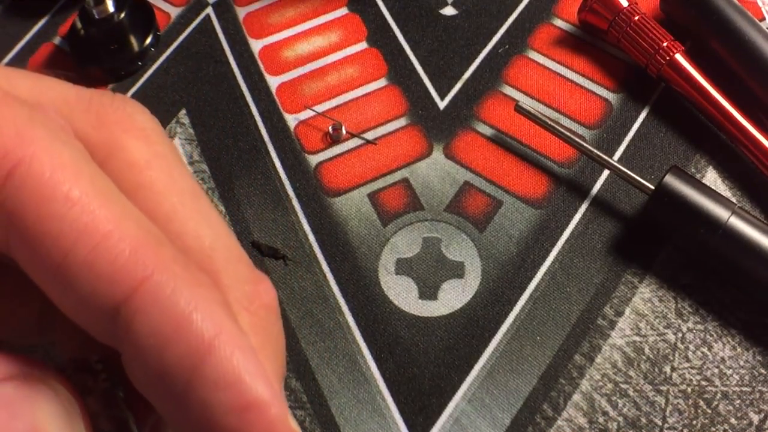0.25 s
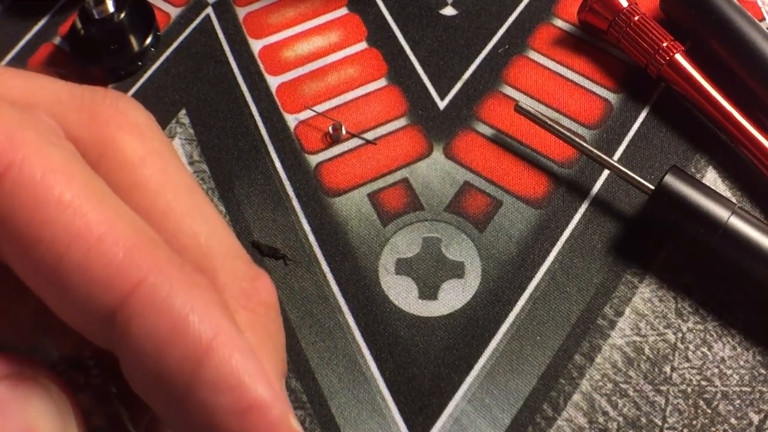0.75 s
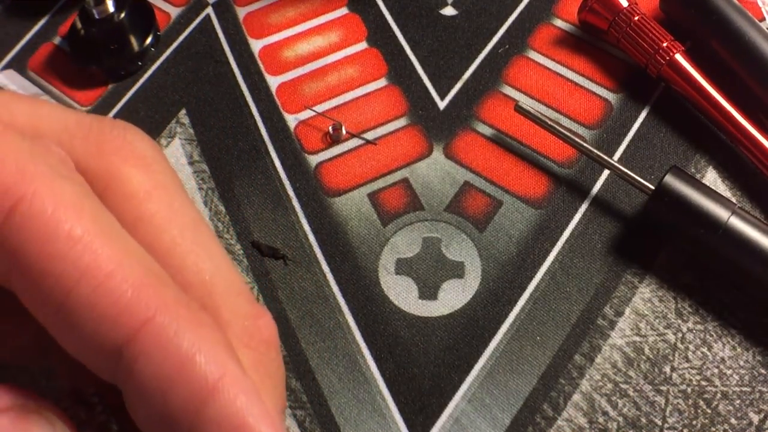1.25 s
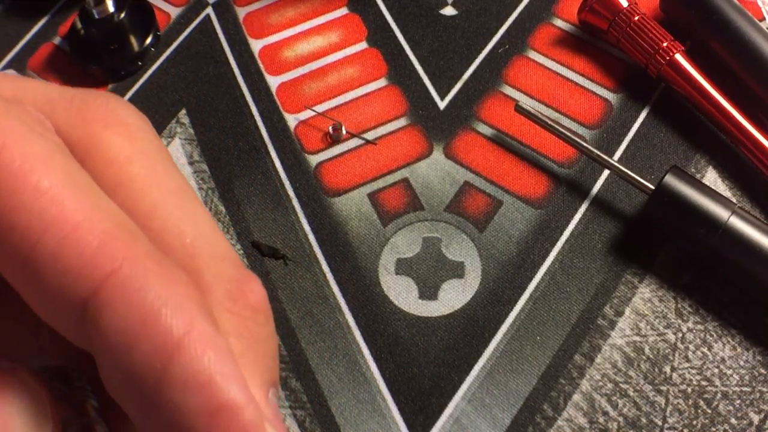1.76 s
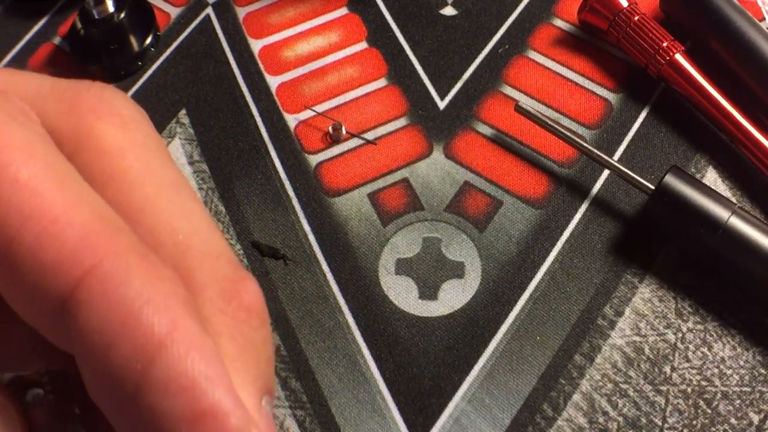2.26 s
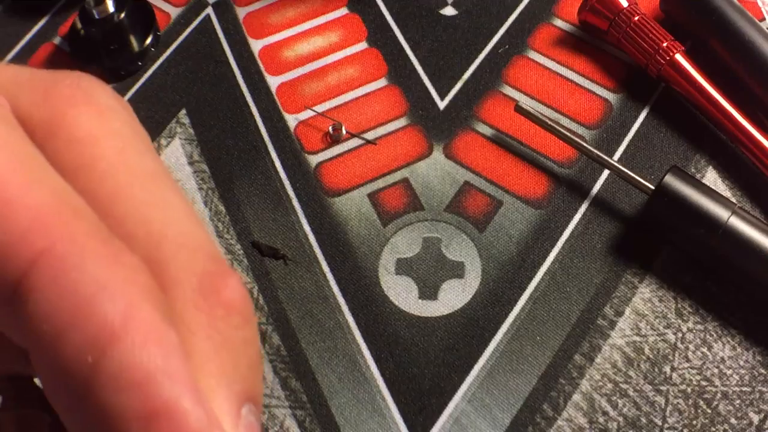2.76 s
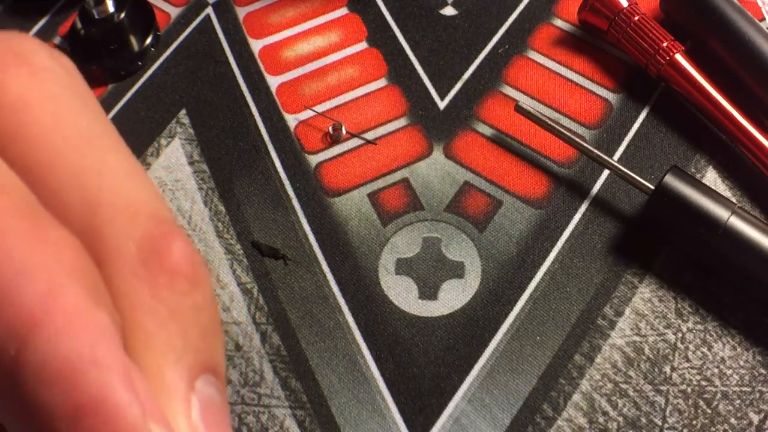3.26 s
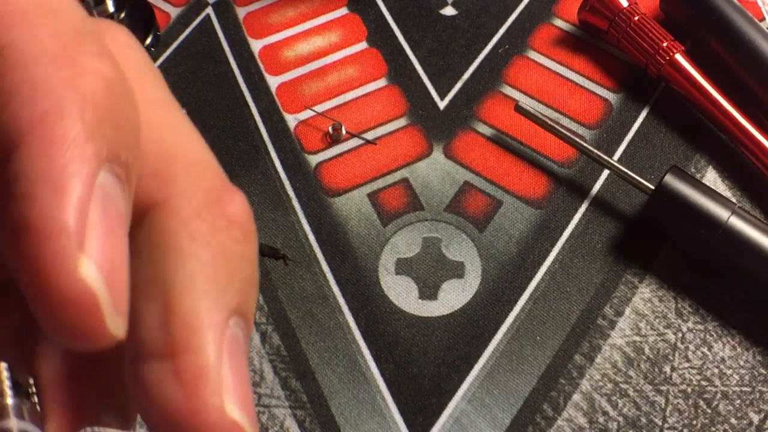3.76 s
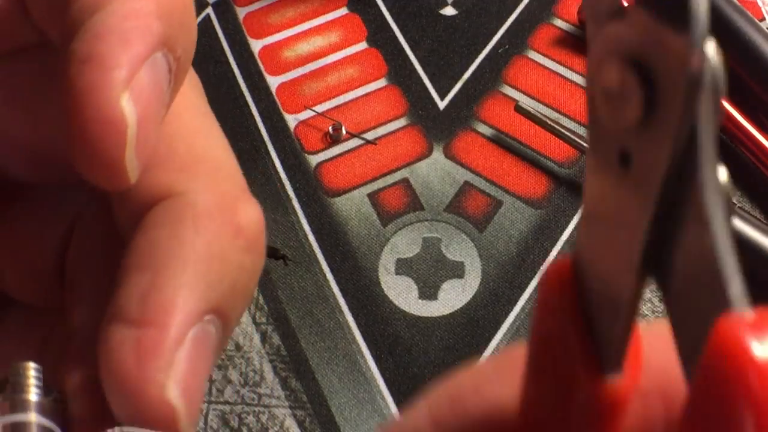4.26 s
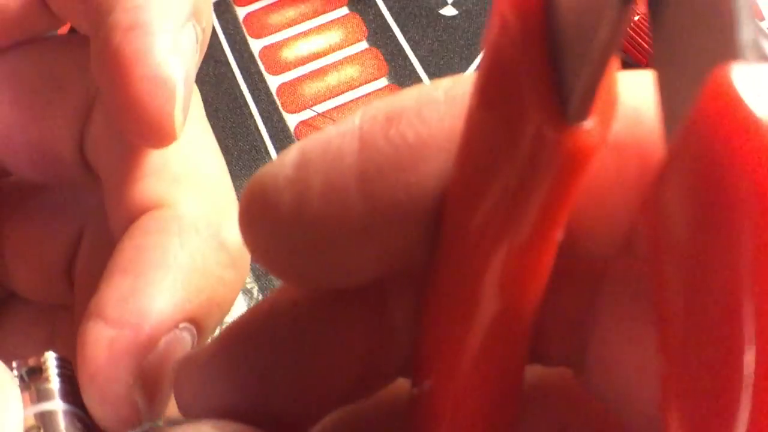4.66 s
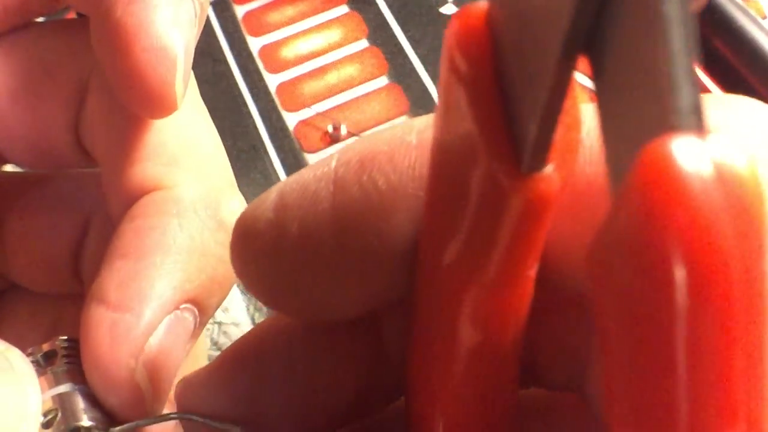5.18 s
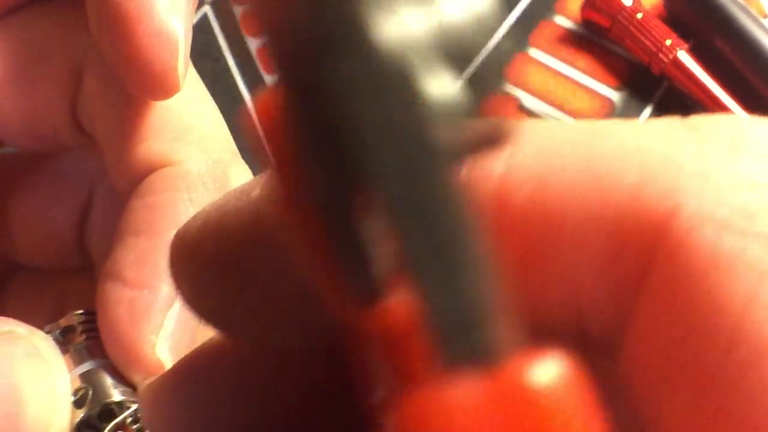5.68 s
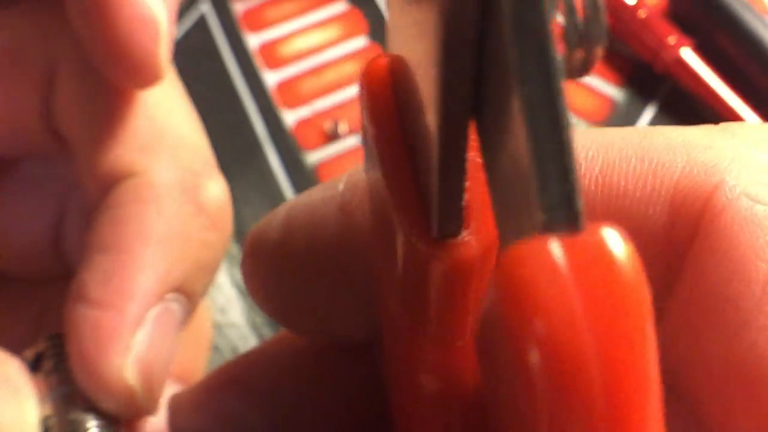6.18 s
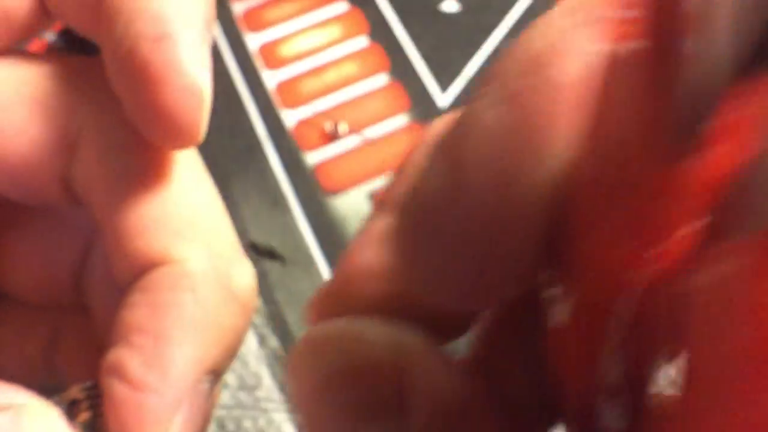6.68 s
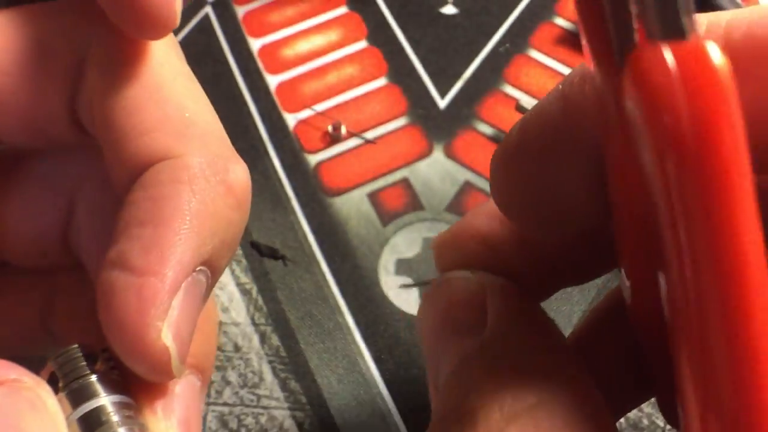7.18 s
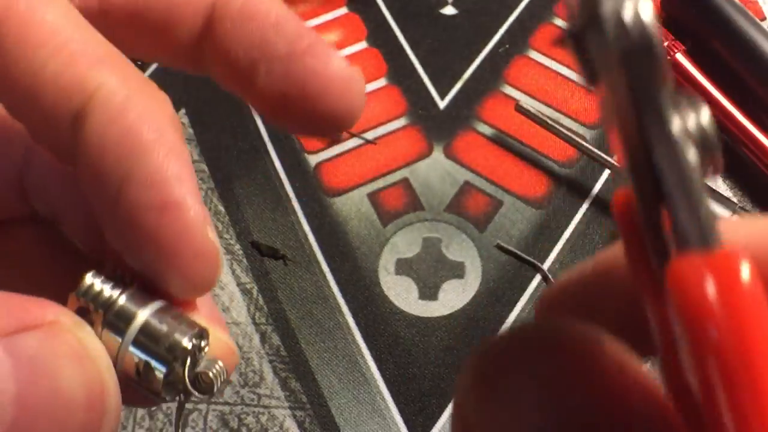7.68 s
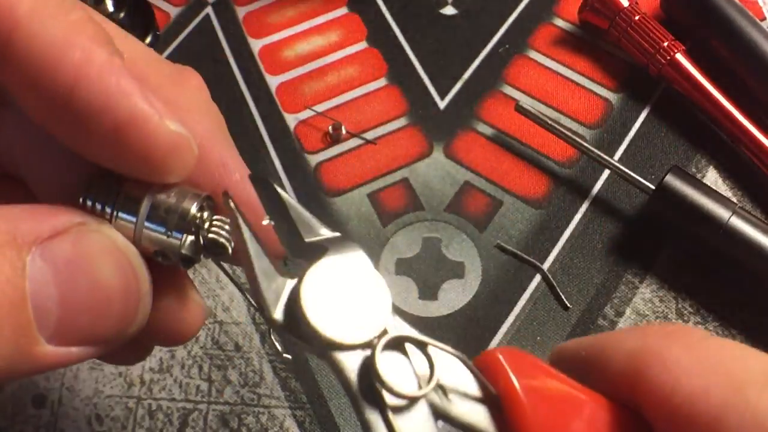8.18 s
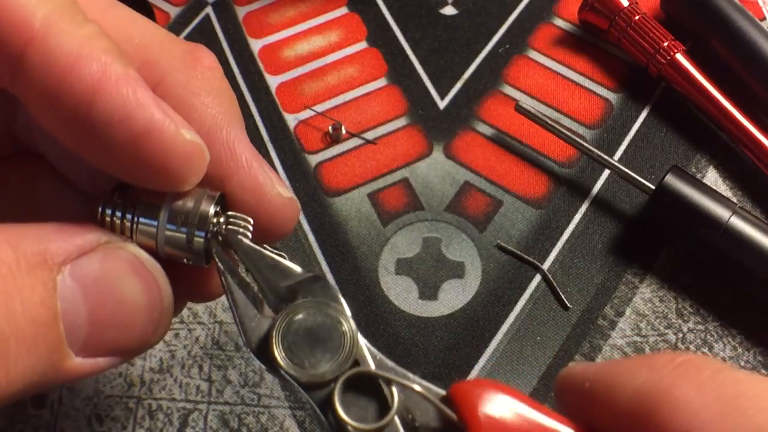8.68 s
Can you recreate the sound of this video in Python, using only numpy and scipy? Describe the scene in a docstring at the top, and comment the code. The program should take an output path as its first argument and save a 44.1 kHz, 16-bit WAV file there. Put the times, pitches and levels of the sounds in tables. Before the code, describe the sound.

Close microphone at a covered table indoors, almost dry. Low handling rumble and skin rustle accompany sparse tiny metallic clicks, one clearer than the rest. Midway steel slides briefly and a tool knocks the table hard with a loose metallic rattle. A weaker double bump comes later, then a sudden sharp wire snap, by far the loudest event. Soft dull taps and quiet rubbing end it, with faint mains hum beneath.

```python
"""At a mat-covered table in a quiet room, fingers handle a small metal coil holder that ticks and bumps.
Flush cutters are picked up with a scrape, knock twice on the table, then snap through a coil wire.
Metal parts sound as struck resonators, the table as decaying modes, and rubbing as filtered noise.
Beneath lie a low handling rumble, a faint mains hum and hiss; a very faint high whine comes and goes."""
import sys
import numpy as np
from scipy import signal
from scipy.fft import rfft, irfft
from scipy.io import wavfile
from scipy.ndimage import uniform_filter1d

SR = 44100
rng = np.random.default_rng(int(sys.argv[2]) if len(sys.argv) > 2 else 0)


def unload_wav(signal):
    """Save mono or channel-first audio to the path in sys.argv[1] as 16-bit WAV at rate SR, clipped to [-1, 1]."""
    wavfile.write(
        sys.argv[1],
        SR,
        np.round(np.clip(np.atleast_2d(signal).T, -1, 1) * 32767).astype(np.int16),
    )


N = 394254
TIME = np.arange(N) / SR

# Mains hum, steady tones: pitch_hz [Hz], level_db [dB]
HUM_TONES = [(60, -72.5), (108, -81.5), (241, -88)]
# Spectrum of the background hiss: frequency_hz [Hz], level_db [dB]
HISS_SPECTRUM = [(100, 1), (240, 2), (330, -4.5), (600, -10.5), (1500, -12.5), (3000, -9), (3700, -11.5),
                 (4200, -14.5), (5500, -9.5), (9200, -10), (10500, -15.5), (11600, -13), (16000, -21)]
# Times when the faint whine sounds: start_s [s], end_s [s]
WHINE_TIMES = [(3.43, 3.68), (8.56, 8.8)]
# Spectrum of the table's deep sway: frequency_hz [Hz], level_db [dB]
RUMBLE_SPECTRUM = [(20, -31), (32, -13.5), (48, 7), (60, 0.5), (80, -17), (170, -33), (600, -61)]
# Rumble of the resting hands, before UNREST_GAIN_DB: time_s [s], level_db [dB]
UNREST_LEVELS = [(0.0, -59.5), (0.9, -61), (1.77, -54), (2.09, -65.5), (3.09, -71.5), (3.5, -64),
                 (7.45, -63), (8.05, -58), (8.94, -74.5)]
# Hands lean on the table without a knock: middle_s [s], length_s [s], level_db [dB]
LEANS_ON_TABLE = [(0.192, 0.2, -40.5), (0.432, 0.12, -45), (0.627, 0.11, -46.5), (1.295, .07, -44.5),
                  (2.175, 0.085, -50), (3.292, 0.26, -50), (3.651, 0.1, -41.5), (4.149, .09, -40.5),
                  (4.248, 0.1, -49.5), (6.464, 0.25, -51.5), (6.755, 0.22, -42.5), (7.452, 0.087, -48.5),
                  (7.606, 0.12, -50), (8.539, 0.098, -51)]
# Fingers rub over tool and mat: middle_s [s], length_s [s], rustle_db [dB], hiss_db [dB]
FINGER_RUBS = [(0.17, 0.14, -63.5, -77), (0.476, 0.34, -74, -80.5), (0.99, .25, -74, -92),
               (1.623, 0.079, -64.5, -73), (1.76, 0.11, -63.5, -71), (1.883, 0.13, -71, -78),
               (4.142, 0.098, -62.5, -62), (4.371, 0.063, -61.5, -65.5), (6.439, 0.053, -63, -82),
               (6.53, 0.11, -66, -79), (6.772, 0.31, -67, -69.5), (7.576, 0.16, -64.5, -69.5),
               (7.694, 0.13, -68.5, -75.5), (7.91, 0.091, -69, -82), (7.96, 0.36, -72, -77),
               (8.18, 0.12, -87, -75.5)]
# Spectrum of the low rustle: frequency_hz [Hz], level_db [dB]
RUSTLE_SPECTRUM = [(90, -12), (205, 5), (285, -3.5), (375, 2.5), (520, -19.5), (680, -7.5), (1100, -33.5),
                   (3000, -26)]
# Spectrum of the fine hiss of skin: frequency_hz [Hz], level_db [dB]
SKIN_SPECTRUM = [(1000, -8.5), (2600, -5), (4000, -13.5), (6300, 1), (8500, -2.5), (11000, -11),
                 (16000, -21.5)]
# Dry scuffs of handles, jaws and holder: middle_s [s], length_s [s], level_db [dB], centre_hz [Hz]
DRY_SCUFFS = [(0.175, 0.04, -74, 5400), (1.207, 0.031, -71, 1420), (1.454, 0.016, -58, 580),
              (1.597, .018, -72, 2700), (4.363, 0.056, -65, 2390), (4.3955, 0.006, -38.5, 1200),
              (5.628, 0.047, -67.5, 780), (6.303, 0.048, -59, 694), (6.679, .014, -64, 6500),
              (7.443, .037, -65.5, 330), (7.59, 0.12, -72, 6800), (8.146, .018, -65.5, 5700)]
# Skin or steel sticks and squeaks softly: middle_s [s], length_s [s], level_db [dB], pitch_hz [Hz]
SOFT_SQUEAKS = [(0.097, 0.058, -75, 650), (0.357, 0.025, -66, 690), (1.165, .04, -74.5, 690),
                (4.144, .009, -56, 10050), (5.75, 0.038, -75.5, 525), (5.86, .1, -79.5, 525),
                (5.961, 0.047, -73.5, 530), (7.575, 0.08, -68, 400)]
# Steel slides as the cutters are lifted and turned: start_s [s], level_db [dB], t60_s [s]
STEEL_SCRAPES = [(4.082, -51.5, 0.089), (4.087, -58.5, .12), (4.118, -65.5, 0.2), (7.384, -65.5, .03)]
# Resonances of the sliding steel: pitch_hz [Hz], width_hz [Hz], level_db [dB]
STEEL_MODES = [(5380, 160, 3.5), (5820, 270, -1), (7260, 200, -3), (8190, 430, -6.5), (9650, 200, -2),
               (9900, 220, 0), (11050, 290, -4), (15400, 530, -12)]
# Loose parts buzz around the hard knocks: start_s [s], level_db [dB], t60_s [s]
LOOSE_BUZZES = [(4.3885, -42.5, 0.046), (4.401, -59, 0.045), (6.2785, -50.5, 0.033), (6.285, -52, 0.16)]
# Spectrum of the buzz: frequency_hz [Hz], level_db [dB]
BUZZ_SPECTRUM = [(500, 2), (1000, -0.5), (1400, -9), (2100, -3.5), (2500, 0.5), (3200, -8), (4300, -8.5),
                 (5400, -7), (6000, -21), (8000, -23.5), (15000, -42.5)]
# One loose metal part bounces: start_s [s], level_db [dB]
BOUNCES = [(4.4015, -25), (4.408, -22), (6.279, -24)]
# Resonances of that loose part: pitch_hz [Hz], width_hz [Hz], level_db [dB]
LOOSE_PART_MODES = [(2500, 110, 1), (5300, 450, -0.5)]
# The holder shifts in the fingers with a dull double click: start_s [s], level_db [dB]
HOLDER_NUDGES = [(1.211, -23), (1.214, -19.5)]
# Resonances of the gripped holder: pitch_hz [Hz], width_hz [Hz], level_db [dB]
GRIPPED_MODES = [(1070, 100, 3.5), (1420, 130, 5.5), (2690, 260, 2), (6500, 2000, -13)]
# Dull taps of the tool in the hand: start_s [s], level_db [dB]
TOOL_TAPS = [(7.4285, -16), (7.433, -23), (7.488, -19.5), (7.521, -31)]
# Resonances of the hand-held tool: pitch_hz [Hz], width_hz [Hz], level_db [dB]
TOOL_MODES = [(860, 130, 2.5), (1300, 150, 3), (1880, 130, 1.5), (2280, 180, -0.5), (2630, 130, -2),
              (3040, 110, -1), (6360, 4000, -20)]
# Small metal ticks of wire and holder: start_s [s], level_db [dB], brightness_db [dB]
METAL_TICKS = [(0.4962, -36.5, 4), (1.361, -41, -4), (1.45, -39, -3), (1.4995, -35.5, 3), (1.731, -39.5, 3),
               (2.0947, -22, -0.5), (2.503, -38, 1), (3.275, -51, 5), (3.5066, -40, 3), (3.5906, -39, -3),
               (4.51, -39, 5.5), (4.7314, -39.5, -3), (5.5135, -38.5, 2.5), (6.5165, -34, 3),
               (7.5205, -37, 4), (8.144, -43, 0), (8.4617, -37.5, 3)]
# Resonances of the free holder: pitch_hz [Hz], width_hz [Hz], level_db [dB]
HOLDER_MODES = [(1687, 50, 3.5), (2160, 280, -5), (2880, 260, 3), (4410, 550, 6), (4930, 960, 2),
                (5680, 140, 7), (6500, 490, 6), (9430, 1000, 4), (11530, 350, 5), (13400, 860, -1),
                (15400, 1100, -9)]
# Padded bumps on the table: start_s [s], level_db [dB], hand_firmness [0-1], upper_lift_db [dB]
TABLE_KNOCKS = [(0.078, -62, 0.7, -6), (0.349, -61, 1, 0), (0.723, -58, 0.7, 1), (1.232, -52, 0.96, 4.5),
                (1.452, -52, 0.5, 3), (1.597, -53, 0.76, -2.5), (1.733, -52, 0.92, 0),
                (1.895, -58.5, 0.6, 2), (2.003, -54, 0.33, 2.5), (4.3902, -22.5, 0.19, 1),
                (4.99, -65, 0.2, 7.5), (5.192, -59.5, 0.63, 3), (5.388, -54, 0.5, 6), (5.532, -57, 0.46, 3),
                (6.2793, -41, 0.8, 2.5), (6.2934, -39.5, 0.6, 0), (6.688, -53, 0.7, -3),
                (6.856, -63.5, 1, 4), (8.064, -63, 0.65, -4)]
# Modes of the table before the hand acts on them: pitch_hz [Hz], level_db [dB], t60_s [s]
TABLE_MODES = [(117, -8, 0.065), (198.2, 2.5, 0.26), (315, -6.5, 0.034), (342, -35, 0.5),
               (380, -3.5, 0.058), (534, -32, 0.12), (665, -18.5, 0.085), (738, -25.5, 0.18)]
# Resonances of the breaking wire: pitch_hz [Hz], width_hz [Hz], level_db [dB]
CRACK_MODES = [(7760, 960, 4), (8800, 1400, 1), (10000, 900, -3), (1760, 1500, -16)]
# The jaws slam shut and chatter: start_s [s], level_db [dB]
JAW_CLASHES = [(6.6856, -15), (6.6925, -19), (6.6982, -8), (6.6999, -13), (6.7016, -12), (6.7112, -3.5),
               (6.713, -6), (6.7148, -6.5)]
# Resonances of the jaws: pitch_hz [Hz], width_hz [Hz], level_db [dB]
JAW_MODES = [(1266, 150, 2.5), (2390, 250, -2.5), (2900, 92, -3), (3530, 110, -3.5), (5360, 470, -0.5),
             (5750, 240, 5), (6380, 280, 3), (6800, 120, 2.5), (7750, 680, 1), (8700, 380, -4),
             (9200, 300, -4), (12000, 410, -1.5), (13600, 1700, -9.5)]

HISS_DB = -73.5
WHINE_HZ, WHINE_DB = 8850, -85.5
UNREST_GAIN_DB, UNREST_SWING_DB, UNREST_PER_S = 3, 6.5, 13
# Sway around each bump: lag of its middle, length, level re the bump, ceiling
SWAY_LAG_S, SWAY_S, SWAY_DB, SWAY_TOP_DB = 0.05, 0.13, 7.5, -44.5
# Durations of contact noise, to -60 dB
TICK_T60_S, TAP_T60_S, JAW_T60_S = 0.006, 0.013, 0.002
TICK_PIVOT_HZ = 6500   # brightness raises modes from here up and lowers those below
CONTACT_MS = 0.44   # time at which the push on the table peaks
BUILD_S, STIFFEN, RELAX_S = 0.008, 0.073, 0.03   # the first two scale with the firmness of the hand
BUMP_S = 0.042   # a bump's level is its mean power over this time
CRACK_S, CRACK_DB = 6.6855, 3
CUTOFF_HZ = 16400


def from_db(db):
    """The decibel law: amplitude gain from level."""
    return 10 ** (np.asarray(db) / 20)


def rms_one(x):
    """Normalization: scale a signal to unit mean power."""
    return x / np.sqrt(np.mean(x ** 2) + 1e-20)


def add(track, s, sound):
    """Superposition: sum a sound into the track from a given time."""
    start = max(0, round(s * SR))
    track[start:start + len(sound)] += sound[:N - start]


def fade(t60):
    """Exponential decay: the level falls linearly, followed down to -60 dB."""
    t = np.arange(int(t60 * SR) + 2) / SR
    return np.exp(-np.log(1000) * t / t60)


def fading_noise(t60):
    """Diffuse decay: white noise under an exponential envelope."""
    envelope = fade(t60)
    return envelope * rng.standard_normal(len(envelope))


def swell(length):
    """Gradual onset and release: a half-sine envelope."""
    return np.sqrt(np.hanning(int(length * SR)))


def noise(spectrum):
    """Spectral shaping: white noise weighted over log frequency, at unit power."""
    hz, db = np.transpose(spectrum)
    f = np.maximum(np.fft.rfftfreq(N, 1 / SR), 1)
    top_rolloff = 1 + (f / (2 * hz[-1])) ** 2
    gain = from_db(np.interp(np.log(f), np.log(hz), db)) / top_rolloff
    return rms_one(irfft(rfft(rng.standard_normal(N)) * gain, N))


def body(force, resonances):
    """Modal superposition: a force drives parallel resonators of alternating sign."""
    out = np.zeros(N)
    for k, (hz, width, db) in enumerate(resonances):
        r = np.exp(-np.pi * width / SR)
        poles = [1, -2 * r * np.cos(2 * np.pi * hz / SR), r * r]
        gain = (-1) ** k * from_db(db) * (1 - r * r) / 2
        out += gain * signal.lfilter([1, 0, -1], poles, force + 1e-18)
    return out


def contacts(rows, t60, grit):
    """Impulsive excitation: one sharp push, then a brief spray of tiny slips."""
    force = np.zeros(N)
    for s, db in rows:
        push = fading_noise(t60)
        push *= grit / np.linalg.norm(push)
        push[0] = 1
        add(force, s, from_db(db) * push / np.linalg.norm(push))
    return force


def bursts(rows):
    """Transient envelopes: sudden starts that die away exponentially."""
    level = np.zeros(N)
    for s, db, t60 in rows:
        add(level, s, from_db(db) * fade(t60))
    return level


def catching(rate_hz, depth_db):
    """Irregular modulation: a gain gliding between random levels, at unit power."""
    knots = np.arange(0, TIME[-1] + 1, 1 / rate_hz)
    wander = np.interp(TIME, knots, rng.uniform(-1.1, 1, len(knots)))
    return rms_one(from_db(depth_db * wander))


def background():
    """Stationary sound: steady sinusoids of mains hum beside shaped noise."""
    hum = np.zeros(N)
    for hz, db in HUM_TONES:
        hum += np.sqrt(2) * from_db(db) * np.sin(2 * np.pi * (hz * TIME + rng.random()))
    return hum + from_db(HISS_DB) * noise(HISS_SPECTRUM)


def whine(width_hz=60):
    """Narrow-band noise: a sharp resonance gives a slightly rough tone, switched on and off."""
    on = sum((TIME > start) & (TIME < end) for start, end in WHINE_TIMES)
    tone = rms_one(body(rng.standard_normal(N), [(WHINE_HZ, width_hz, 0)]))
    return from_db(WHINE_DB) * on * tone


def rumble(low_hz=31):
    """Addition of powers: the table sways with resting hands, leaning hands and bumps."""
    s, db = np.transpose(UNREST_LEVELS)
    unrest = from_db(np.interp(TIME, s, db) + UNREST_GAIN_DB)
    power = (unrest * catching(UNREST_PER_S, UNREST_SWING_DB)) ** 2
    sways = [(s + SWAY_LAG_S, SWAY_S, min(db + SWAY_DB, SWAY_TOP_DB)) for s, db, _, _ in TABLE_KNOCKS]
    for middle, length, db in LEANS_ON_TABLE + sways:
        add(power, middle - length / 2, (from_db(db) * swell(length) ** 2) ** 2)
    sway = noise(RUMBLE_SPECTRUM)
    local_power = uniform_filter1d(sway ** 2, size=3000)
    sway *= np.sqrt(power / (local_power + 1e-9))   # holds the noise to the wanted power
    return signal.sosfilt(signal.butter(4, low_hz, "high", fs=SR, output="sos"), sway)


def rubs():
    """Sliding friction: each stroke swells and fades as a low rustle and a fine hiss of skin."""
    low, high = np.zeros(N), np.zeros(N)
    for middle, length, low_db, high_db in FINGER_RUBS:
        add(low, middle - length / 2, from_db(low_db) * swell(length))
        add(high, middle - length / 2, from_db(high_db) * swell(length))
    rustle = low * noise(RUSTLE_SPECTRUM) * catching(rate_hz=50, depth_db=6.5)
    hiss = high * noise(SKIN_SPECTRUM) * catching(rate_hz=330, depth_db=7)
    return rustle + hiss


def scuffs(span=1.55, squeak_span=1.07):
    """Friction bandwidth: broad noise for dry slides, a narrow band where surfaces stick."""
    out = np.zeros(N)
    for rows, ratio in ((DRY_SCUFFS, span), (SOFT_SQUEAKS, squeak_span)):
        for middle, length, db, hz in rows:
            band = signal.butter(3, [hz / ratio, hz * ratio], "band", fs=SR, output="sos")
            envelope = swell(length)
            friction = signal.sosfilt(band, rng.standard_normal(SR))[-len(envelope):]
            add(out, middle - length / 2, from_db(db) * envelope * rms_one(friction))
    return out


def scrapes():
    """Friction-driven resonance: uneven noise excites the modes of sliding steel."""
    friction = rng.standard_normal(N) * catching(rate_hz=900, depth_db=8.5)
    return bursts(STEEL_SCRAPES) * rms_one(body(friction, STEEL_MODES))


def buzzes():
    """Modulated noise: loose parts buzz as decaying, uneven coloured noise."""
    return bursts(LOOSE_BUZZES) * noise(BUZZ_SPECTRUM) * catching(rate_hz=500, depth_db=4)


def rattles():
    """Repeated impact: the bounces of a loose metal part ring its resonances."""
    return body(contacts(BOUNCES, JAW_T60_S, grit=0.5), LOOSE_PART_MODES)


def taps():
    """Damped impact: tool and holder ring dully while held in the hand."""
    tool = body(contacts(TOOL_TAPS, TAP_T60_S, grit=1.1), TOOL_MODES)
    return tool + body(contacts(HOLDER_NUDGES, TAP_T60_S, grit=0.6), GRIPPED_MODES)


def ticks():
    """Impact spectrum: a sharper touch of wire and holder favours the high modes."""
    low_rows = [(s, db - bright_db) for s, db, bright_db in METAL_TICKS]
    high_rows = [(s, db + bright_db / 2) for s, db, bright_db in METAL_TICKS]
    low_modes = [mode for mode in HOLDER_MODES if mode[0] < TICK_PIVOT_HZ]
    high_modes = [mode for mode in HOLDER_MODES if mode[0] >= TICK_PIVOT_HZ]
    low = body(contacts(low_rows, TICK_T60_S, grit=0.8), low_modes)
    return low + body(contacts(high_rows, TICK_T60_S, grit=1.6), high_modes)


def table_response(hand, lift_db, spread_db=3, damping=0.4):
    """Modal decay: a firm hand damps the modes, slows the main one and raises pitch until it relaxes."""
    t = TIME[:SR]
    main_hz = max(TABLE_MODES, key=lambda mode: mode[1])[0]
    pressed_s = RELAX_S * (1 - np.exp(-t / RELAX_S))   # phase advance of a pitch that sinks
    response = np.zeros(SR)
    for hz, mode_db, t60 in TABLE_MODES:
        side = 1 if hz > main_hz else -1   # the upper modes swing against the main one
        lift = lift_db if hz > main_hz else 0
        strength = from_db(mode_db + lift + hand * spread_db * rng.standard_normal())
        # the main mode builds up slowly under a firm hand
        rise = 1 - np.exp(-t / (BUILD_S * hand + 1e-6)) if hz == main_hz else 1
        decay = np.exp(-np.log(1000) * t * (1 + damping * hand) / t60)
        wave = np.sin(2 * np.pi * hz * (t + STIFFEN * hand * pressed_s))
        response += side * strength * rise * decay * wave
    return response


def knocks(drag=0.88, drag_t60=0.11, low_hz=75):
    """Forced vibration: a padded push and the slips of a dragging hand ring the table."""
    out = np.zeros(N)
    age = 1000 * TIME[:SR // 50] / CONTACT_MS
    push = age * np.exp(-age)
    for s, db, hand, lift_db in TABLE_KNOCKS:
        slips = fading_noise(drag_t60)
        slips *= hand * drag / np.linalg.norm(slips)
        slips[0] = 1
        force = signal.fftconvolve(push, slips)
        bump = signal.fftconvolve(table_response(hand, lift_db), force)
        add(out, s, from_db(db) * bump / np.sqrt(np.mean(bump[:int(BUMP_S * SR)] ** 2)))
    # a panel radiates little deep bass
    return signal.sosfilt(signal.butter(2, low_hz, "high", fs=SR, output="sos"), out)


def snip():
    """Fracture and impact: the wire breaks with a bright crack and the jaws clash."""
    crack = body(contacts([(CRACK_S, CRACK_DB)], t60=0.0024, grit=0.59), CRACK_MODES)
    return crack + body(contacts(JAW_CLASHES, JAW_T60_S, grit=1.0), JAW_MODES)


def boom(x, db=-17, t60=0.5, low_hz=305, high_hz=405):
    """Band-limited reverberation: low sounds leave an uneven ring hanging in the room."""
    tail = fading_noise(t60)
    band = signal.butter(2, [low_hz, high_hz], "band", fs=SR, output="sos")
    ring = signal.sosfilt(band, tail / np.linalg.norm(tail))
    return x + from_db(db) * signal.fftconvolve(x, ring)[:N]


def room(x, early_db, early_t60, late_db, late_t60, absorb_hz=9000):
    """Reverberation: quick scatter from hands and table, then the faint, duller tail of the room."""
    early, late = fading_noise(early_t60), fading_noise(late_t60)
    late = signal.sosfilt(signal.butter(2, absorb_hz, fs=SR, output="sos"), late)
    response = np.zeros(N)
    add(response, 0.0015, from_db(early_db) * early / np.linalg.norm(early))
    add(response, 0.008, from_db(late_db) * late / np.linalg.norm(late))
    return x + signal.fftconvolve(x, response[:SR])[:N]


def scene():
    """Superposition of sources: metal with room reflections, the ringing table and the background."""
    metal = scrapes() + buzzes() + rattles() + taps() + ticks() + snip()
    tools = room(metal, early_db=-10.5, early_t60=0.03, late_db=-21.0, late_t60=0.25)
    table = boom(knocks() + rubs())
    return (background() + whine() + rumble() + scuffs() + table + tools)[None]


def record(dry):
    """Band limitation: a steep low-pass filter cuts the top."""
    return signal.sosfilt(signal.ellip(10, 0.1, 80, CUTOFF_HZ, fs=SR, output="sos"), dry)


dry = scene()
out = record(dry)
unload_wav(out)
```